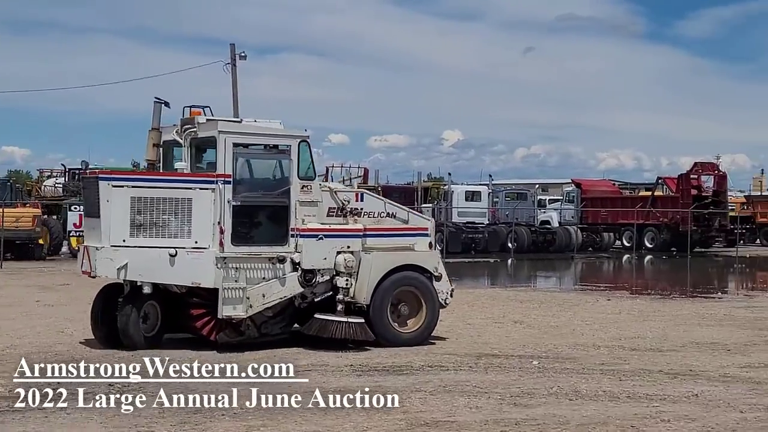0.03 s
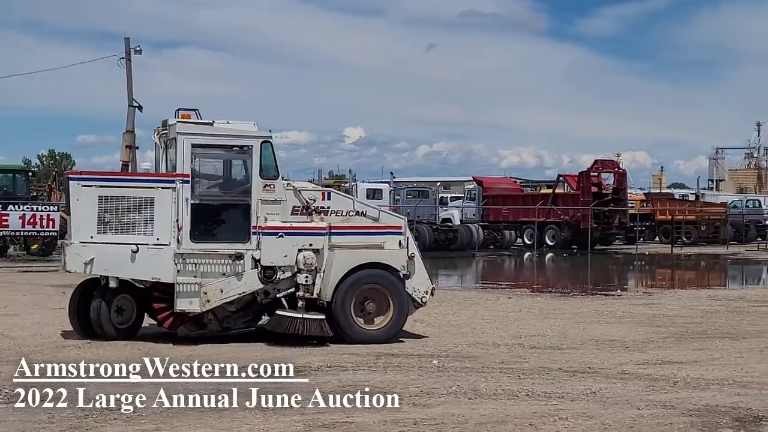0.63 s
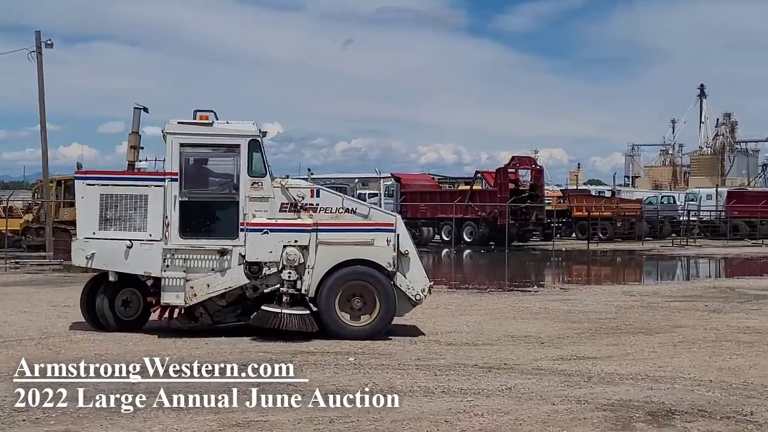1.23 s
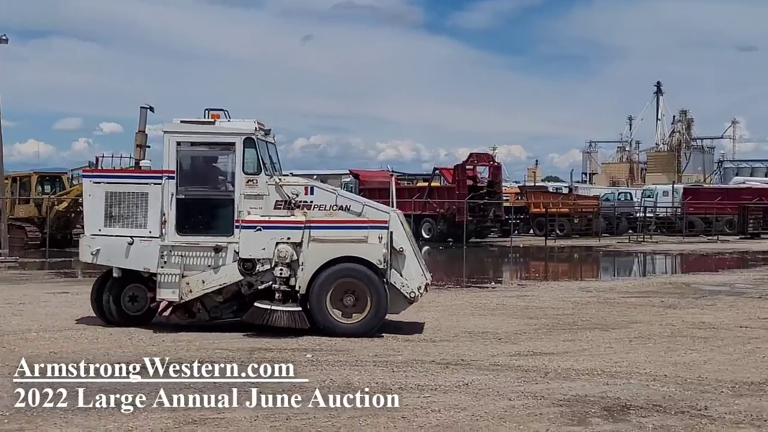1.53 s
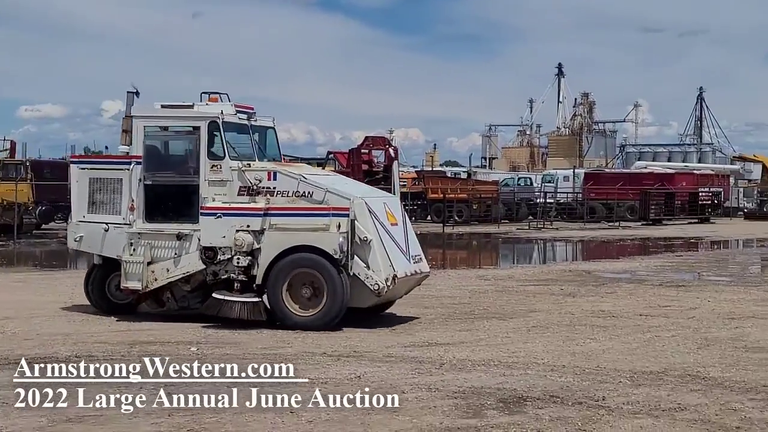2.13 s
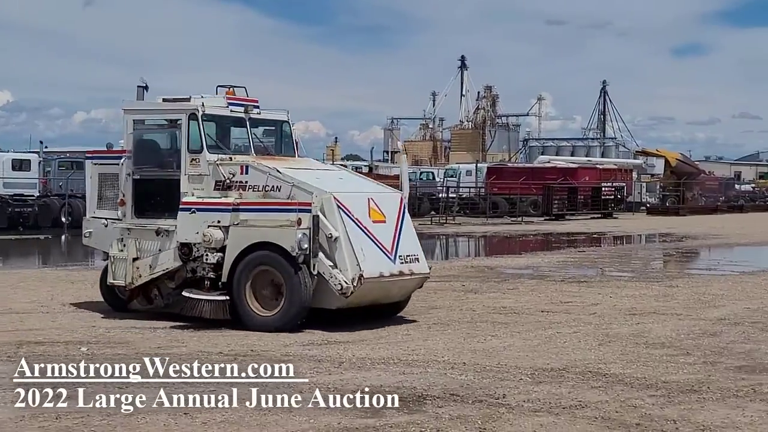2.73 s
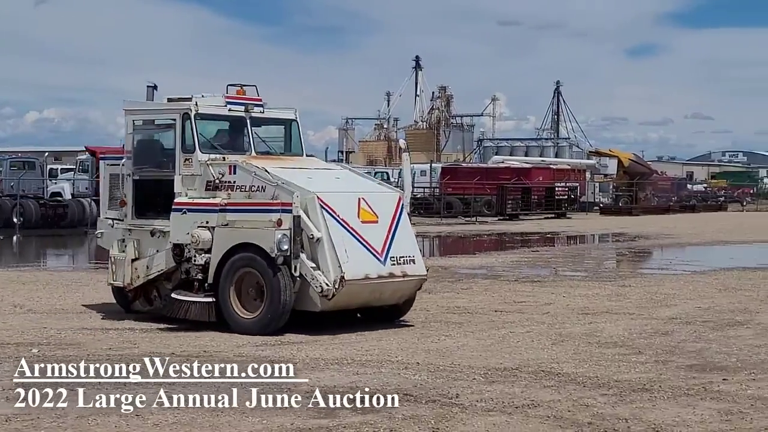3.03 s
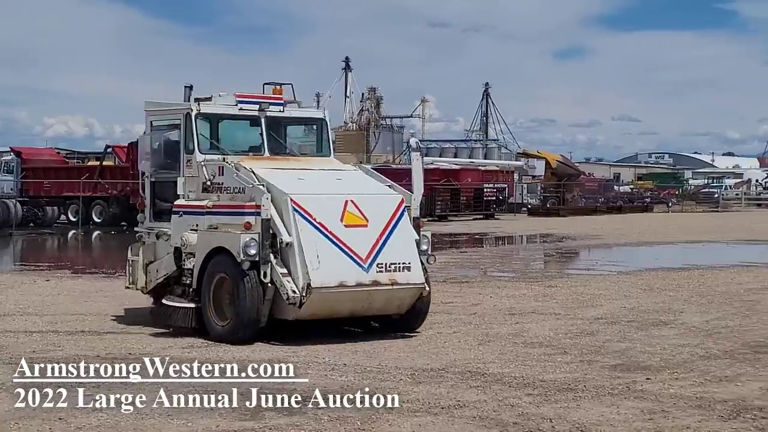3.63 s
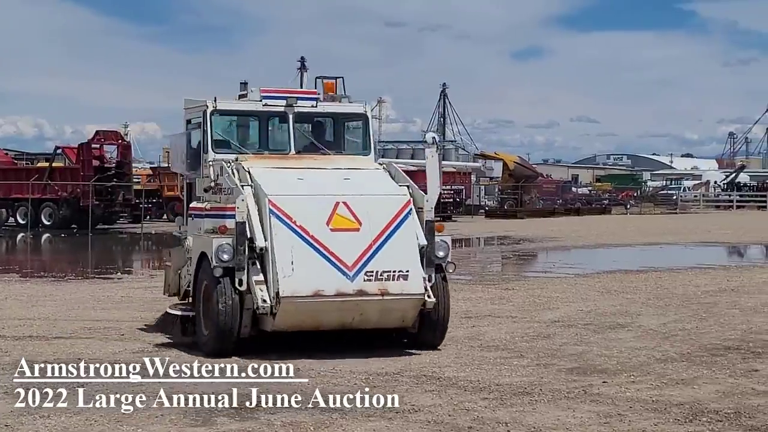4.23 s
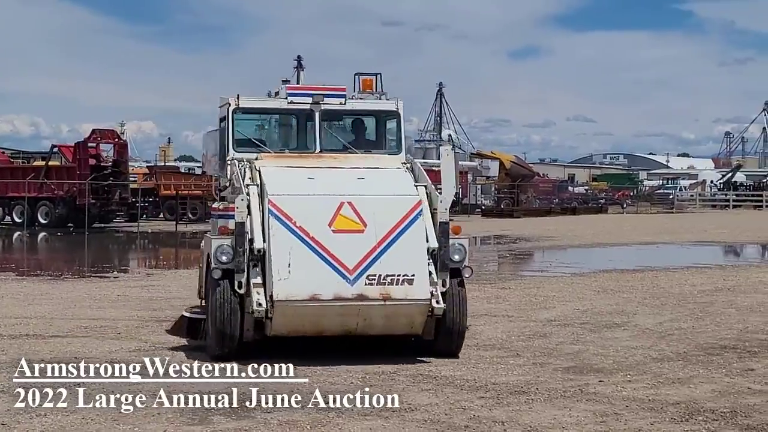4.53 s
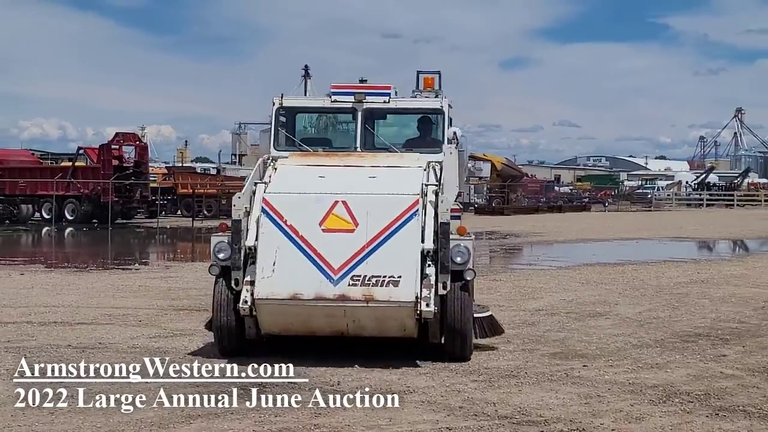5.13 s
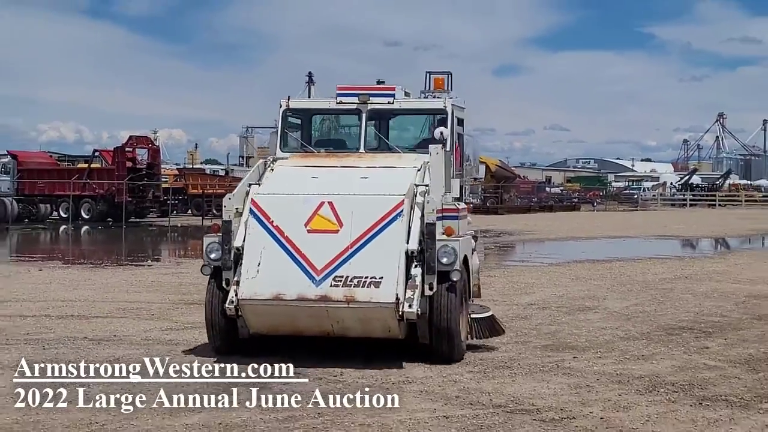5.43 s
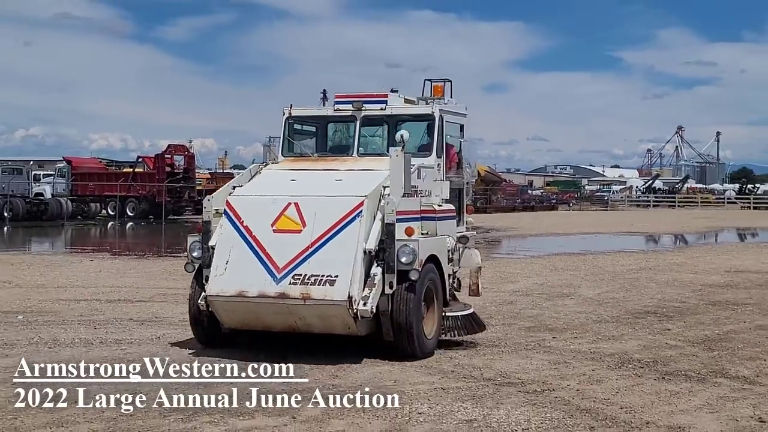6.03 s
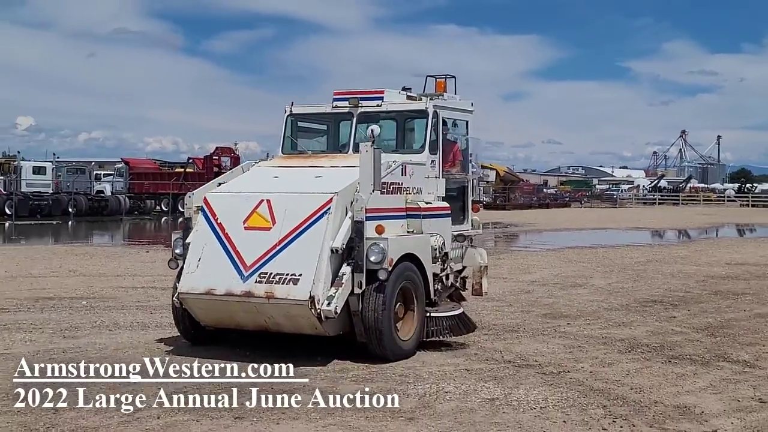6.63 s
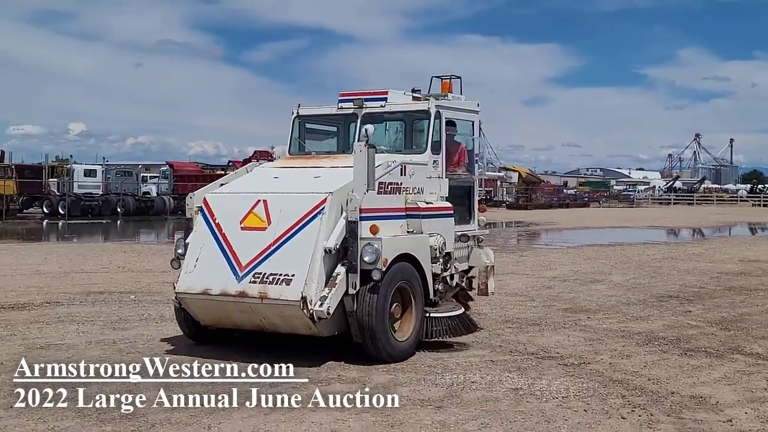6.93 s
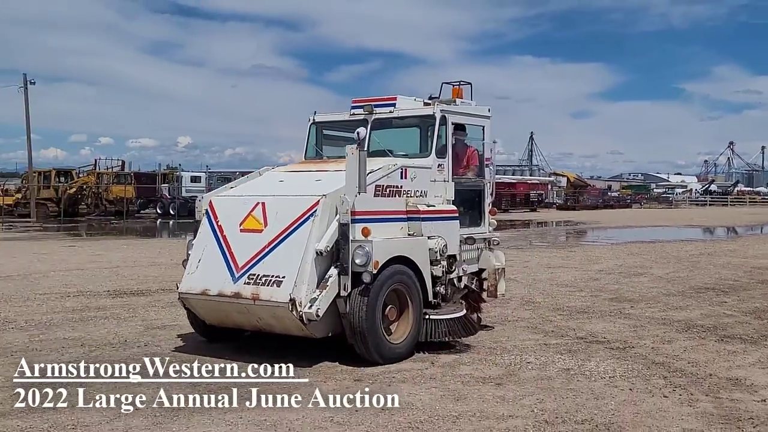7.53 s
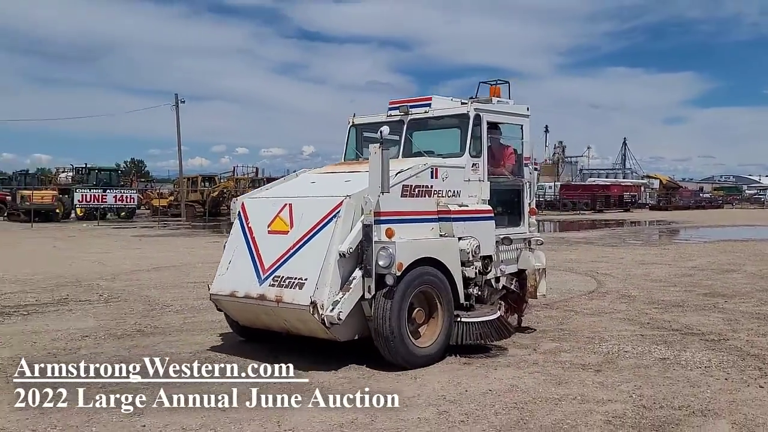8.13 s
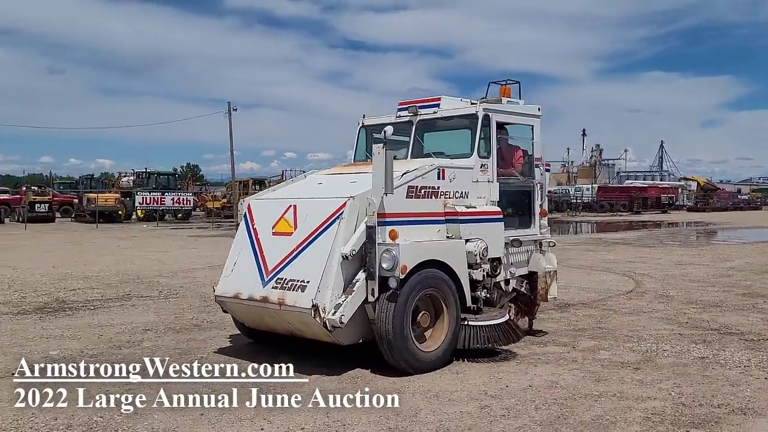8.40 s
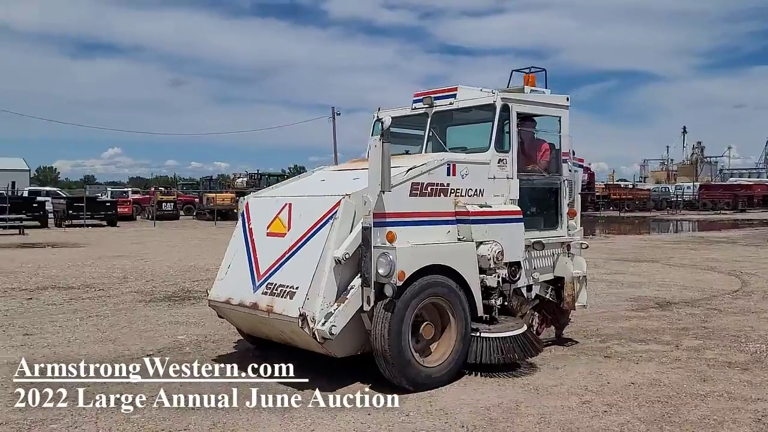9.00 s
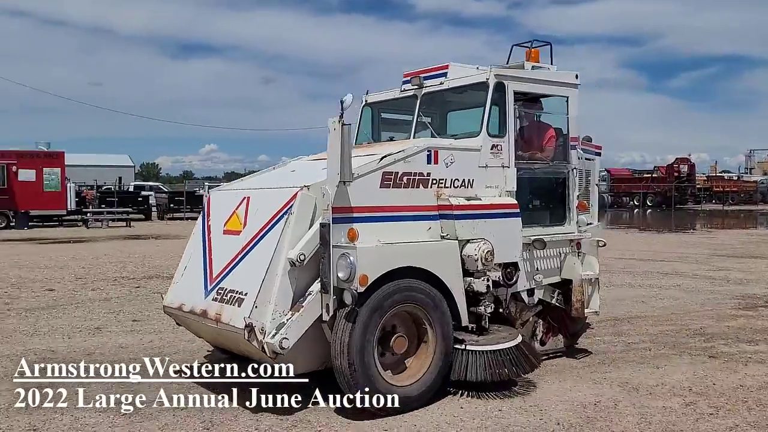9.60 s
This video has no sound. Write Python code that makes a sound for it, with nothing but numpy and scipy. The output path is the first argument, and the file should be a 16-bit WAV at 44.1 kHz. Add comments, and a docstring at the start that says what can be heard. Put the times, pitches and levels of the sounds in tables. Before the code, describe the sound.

A diesel street sweeper drives around on crunching gravel, its engine roaring and clattering steadily, with hydraulic droning and gusts of wind.

```python
"""A gravel yard, where a diesel street sweeper drives round, showing one side, its nose, then the other side.
The rear engine hums, roars and clatters, shaking panels and pipes, and a low drone comes from the nose.
Tyres crunch stones, loose parts tick and knock, and wind buffets the two microphone openings (ports).
As the nose comes round, oil hisses through the steering valve and the turbo whistles.
Then the hydraulic drive motor sings, rising and falling with the road speed."""
import sys
import numpy as np
from scipy import signal
from scipy.fft import rfft, irfft, next_fast_len
from scipy.io import wavfile
from scipy.ndimage import uniform_filter1d

SR = 44100
rng = np.random.default_rng(int(sys.argv[2]) if len(sys.argv) > 2 else 0)


def transcribe(signal):
    """Save signal, clipped to [-1, 1], as a 16-bit WAV file at the path in sys.argv[1]."""
    frames = np.atleast_2d(signal).T
    limited = np.clip(frames, -1, 1)
    pcm = np.round(limited * 32767).astype(np.int16)
    wavfile.write(sys.argv[1], SR, pcm)


N = 430399

# Engine speed, held nearly steady. Each row: time in seconds, firings per second.
FIRING_RATE = [(0, 55.6), (.3, 54.6), (.5, 56.2), (1.0, 56.8), (1.6, 56), (1.87, 54.2), (2.1, 57.3),
               (2.3, 58), (2.53, 55.1), (2.8, 57.4), (8.3, 57.3), (9, 56.4), (9.76, 57.8)]
# The exhaust's tones. Each row: multiple of the firing rate, level in dB.
EXHAUST_TONES = [(1, -31.5), (2, -37.5), (2.5, -39.5), (3, -39.5), (3.5, -49), (4, -41.5), (4.5, -44),
                 (6, -53.5)]
# Fan sound beams out of the side grilles. Each row: peak time in seconds, spread in seconds, level in dB.
FAN_BEAMS = [(.3, 0.49, -34), (1.62, 0.32, -33), (2.45, 0.29, -33.5), (7.2, 0.71, -35), (9.0, 0.6, -28.5)]
# Which way the sweeper faces. Each row: time in seconds, share of sound from the nose (0 to 1),
# delay of that sound at the left port in milliseconds.
HEADING = [(0, 0, 0.049), (2.9, 0.13, 0.046), (3.45, 0.45, 0.12), (4.1, 0.74, 0.37), (4.7, 0.77, 0.53),
           (6.3, 0.94, 0.51), (6.8, 0.93, .53), (7.4, 0.34, 0.53), (9.76, 0.31, 0.67)]
# How late the side's sound reaches the left port. Each row: time in seconds, delay in milliseconds.
SIDE_DELAY = [(0, -0.1), (3.2, -0.093), (7.3, 0.037), (9, .1), (9.76, 0.06)]
# How loudly the sweeper comes across as it turns. Each row: time in seconds, gain in dB.
TURN_GAIN = [(0, 5), (1.6, -0.5), (2.55, 1.5), (3.2, -2.5), (3.85, 3), (5.9, 2), (6.25, -0.5), (6.65, 3),
             (7.05, 0.5), (7.4, -1), (8.2, -3.5), (8.8, -2.5), (9.76, 1.5)]
# The engine's roar, and its clatter from the side and nose. Each row: frequency in Hz, strength in dB.
ROAR_SPECTRUM = [(100, -4), (190, 4.5), (260, 8), (340, 2.5), (430, -0.5), (560, 1.5), (720, 1),
                 (900, -6.5), (1200, -14), (2000, -83)]
CLATTER_SIDE = [(500, -17.5), (850, -6), (1000, -3), (1230, 2), (1450, -8.5), (1650, -3), (1850, -4.5),
                (2100, -7.5), (2400, -18), (2900, -23), (4500, -52)]
CLATTER_NOSE = [(500, -12), (850, -4), (1000, 4.5), (1230, 3.5), (1450, 4.5), (1650, 2.5), (1850, 0),
                (2100, -4.5), (2400, -9.5), (2900, -29), (4500, -48)]
# Ringing panels and pipes, each heard while it faces this way.
# Each row: peak time in seconds, spread in seconds, pitch in Hz, width in Hz, level in dB.
PANEL_RINGS = [(0.23, 0.69, 1228, 64, -45.5), (1.6, 0.37, 1335, 45, -44.5), (1.06, 1.75, 2205, 430, -47),
               (2.55, 0.73, 576, 450, -39), (3.77, 0.33, 1660, 420, -38.5), (4.3, 0.45, 2380, 1700, -47),
               (4.6, 0.091, 1540, 220, -47), (5.22, 0.5, 1600, 82, -44), (5.9, 0.6, 1670, 290, -42.5),
               (6.27, 0.22, 1810, 290, -39.5), (6.6, 0.13, 1770, 350, -37.5), (5.88, 0.3, 4050, 1100, -45),
               (6.87, 0.79, 4520, 750, -48), (6.5, 1.9, 344.5, 50, -39.5), (7.1, 3.6, 1578, 62, -47.5),
               (7.7, 1.6, 1110, 93, -49), (8.9, 0.3, 7300, 140, -64), (9.7, 0.19, 342, 290, -32.5)]
# The low, sinking drone. Each row: time in seconds, pitch in Hz, level in dB.
DRONE_CURVE = [(0, 70, -35), (2.85, 69.5, -35), (3.1, 69.1, -24.5), (4.3, 65.6, -24.5), (6.1, 62.4, -24.2),
               (6.75, 62.4, -28), (7, 62.4, -32), (7.7, 62.4, -30), (9.76, 62.4, -44)]
# Its swells and dips. Each row: middle in seconds, spread in seconds, change in dB.
DRONE_SWELLS = [(3.25, 0.21, 2), (4.75, 0.23, 2.5), (5.23, 0.1, -4), (5.62, 0.22, 2.8), (6.77, 0.033, 9)]
# How the oil pipes and the pump housing ring. Each row: pitch in Hz, width in Hz, strength in dB.
PIPE_RINGS = [(7290, 300, -7), (11030, 280, 0), (11960, 150, -4.5)]
HOUSING_RINGS = [(3380, 200, -14.5), (3900, 230, -6), (4320, 480, -4.5), (4930, 190, -7.5)]
# When each of them beams this way. Each row: peak time in seconds, spread in seconds, level in dB.
PIPE_BEAMS = [(0, 0.77, -62), (2.57, 0.13, -63), (2.6, .5, -64.5)]
HOUSING_BEAMS = [(2.53, 0.51, -50.5), (3.85, 0.097, -49), (5, 0.6, -50), (7.05, 0.15, -44),
                 (8.2, 0.37, -56), (9, 0.5, -67)]
# The gravel's crunch from the side and nose. Each row: frequency in Hz, strength in dB.
GRAVEL_SIDE = [(1800, -13), (2900, -1.5), (3400, -2), (3700, 0), (4450, 0.5), (5200, 2.5), (6000, 0),
               (6600, -2), (7300, -1.5), (8500, -12), (9600, -8), (11200, -8.5), (12500, -8.5), (15000, -9)]
GRAVEL_NOSE = [(1800, -16), (2900, 5.5), (3400, 2.5), (3700, 2.5), (4450, 2.5), (5200, -1.5), (6000, -1),
               (6600, 0), (7300, -1), (8500, -10), (9600, -14), (11200, -10.5), (12500, -7), (15000, -15)]
# How loose parts ring. Each row: pitch in Hz, strength in dB, seconds to fade by 60 dB.
LOOSE_PART_RINGS = [(433, -1.5, 0.029), (794, -4, 0.022), (1190, 1, 0.0089), (2000, -7.5, 0.015),
                    (2370, -26, 0.0077), (3820, -14, 0.0068), (4850, -15.5, 0.0065)]
# The breeze. Each row: time in seconds, level in dB, left minus right in dB.
BREEZE = [(0, -28, 8), (.4, -28.5, 7), (.75, -24.5, 3), (1.15, -29.5, -8), (1.75, -26, 0), (2.2, -25.5, -6),
          (2.7, -26.5, -4), (3.4, -24, -7.5), (4.4, -27.5, -7), (6.8, -26, -2), (7.3, -21.5, -2),
          (7.9, -22.5, 2), (8.65, -27, 5), (9.1, -28.5, -2), (9.76, -32.5, -8)]
# Gusts on the left port. Each row: start in seconds, end in seconds, level in dB.
GUSTS = [(0.16, 0.261, -16), (0.455, 0.641, -17.5), (.842, .892, -13), (7.68, 7.79, -14.5),
         (7.825, 8.05, -12.8), (8.05, 8.19, -16), (8.235, 8.305, -13.5), (8.472, 8.549, -19.5)]
# The rumble of the breeze and of the gusts. Each row: frequency in Hz, strength in dB.
BREEZE_SPECTRUM = [(15, -38), (30, -17), (45, -8), (62, -5.5), (85, -3.5), (125, -4.5), (180, -13),
                   (280, -16), (450, -35), (1000, -31.5)]
GUST_SPECTRUM = [(20, -29), (60, 0), (130, -2.5), (260, 0), (350, -5), (500, -16.5), (800, -29.5),
                 (2000, -67)]
# Single swirls of air slap the left port. Each row: start in seconds, level in dB.
WIND_SLAPS = [(0.166, 2), (0.85, -6), (8.248, -1)]
# Stones hit steel. Each row: start in seconds, level in dB, pitch in Hz.
STONE_PINGS = [(1.785, -51, 5510), (3.806, -48, 7800)]
# Loose parts knock. Each row: start in seconds, level in dB, brightness in dB per octave.
KNOCKS = [(1.792, -29, 0), (2.446, -29, 0), (5.297, -24, -4), (6.549, -21, -1), (6.884, -21.5, 0),
          (7.67, -18, 2), (7.774, -18.5, -5.5), (9.479, -25, 0)]
# Oil surges through the steering valve. Each row: peak time in seconds, spread in seconds, level in dB.
VALVE_SURGES = [(3.025, 0.025, -52), (4.85, 0.52, -48.5), (5.05, 0.1, -52), (5.72, 0.14, -43.5),
                (5.9, 0.027, -45), (6.0, 0.12, -57), (6.75, 0.17, -53)]
# The valve's hiss. Each row: frequency in Hz, strength in dB.
VALVE_SPECTRUM = [(3000, -4.5), (4000, -3), (4900, -9), (5600, -1), (6600, -3), (7500, -6), (8700, -19),
                  (10900, -16), (12500, -8), (15000, -19)]
# The valve's high note, rising and sinking with the flow.
# Each row: time in seconds, pitch in Hz, level in dB, left minus right in dB.
VALVE_SONG = [(3.9, 10600, -90, -13), (4.3, 11000, -62, -13), (4.65, 11500, -55.5, -13),
              (4.9, 11780, -49.5, -12), (5.2, 11900, -51, -12), (5.42, 11850, -55, -8),
              (5.62, 11750, -50.5, -5), (5.95, 11600, -51.5, -5), (6.4, 11400, -85, -5)]
# The turbo spins up and down. Each row: time in seconds, pitch in Hz.
TURBO_PITCH = [(3.7, 6800), (4.0, 7200), (4.55, 7980), (4.8, 8130), (5.2, 8330), (6.4, 7850)]
# The drive motor follows the road speed. Each row: time in seconds, pitch in Hz.
DRIVE_PITCH = [(5.4, 110), (6.05, 146), (6.4, 167), (6.68, 177), (6.86, 161), (6.98, 135), (7.14, 119),
               (7.4, 129), (7.85, 143), (8.72, 153), (9.0, 163), (9.76, 181)]
# It swells and dips with the load. Each row: time in seconds, level in dB.
DRIVE_LEVEL = [(5, -70), (5.55, -33), (6.15, -27.5), (6.8, -28.5), (6.97, -24.5), (7.2, -32), (7.6, -29),
               (7.9, -19.7), (8.28, -18), (8.5, -24), (8.73, -36), (8.95, -23), (9.27, -22.5),
               (9.45, -26.5), (9.76, -25.5)]
# Its upper tone, and a second wheel motor running an eighth faster in the turn with its own upper tone, as it
# pulls away. Each row: multiple of its pitch, level in dB.
PULL_TONES = [(1.125, -34), (2, -34), (2.25, -43)]
# The two ports hear pitches differently. Each row: frequency in Hz, left minus right in dB.
PORT_BALANCE = [(700, 0), (1300, -2), (2300, 3.5), (3100, 2), (4000, -1), (5400, 1), (6600, -6),
                (8200, -0.5)]


def from_db(db):
    """Turn decibels into a gain."""
    return 10 ** (np.asarray(db) / 20)


def rms_one(x):
    """Scale x so its average (rms) level is 1."""
    return x / np.sqrt(np.mean(x ** 2) + 1e-20)


def in_time(rows):
    """Join a table's timed rows with straight lines, giving one curve per value column."""
    s, *columns = np.transpose(rows)
    return [np.interp(np.arange(N) / SR, s, c) for c in columns]


def drift(hz):
    """A smooth random wander of size about 1; higher hz wanders faster."""
    r = np.exp(-80 * np.pi * hz / SR)
    slow = signal.lfilter([1], [1, -2 * r, r * r], rng.standard_normal(N // 40 + 2002))[2000:]
    return np.interp(np.arange(N) / 40, np.arange(len(slow)), rms_one(slow))


def angle(hz):
    """The running phase of something that turns at hz."""
    return 2 * np.pi * np.cumsum(hz) / SR


def tone(phase, db):
    """A pure tone with an rms level of db."""
    return np.sqrt(2) * from_db(db) * np.sin(phase)


def pan(left_db):
    """Gains for the two ports, with the left one left_db above the right."""
    return from_db(np.array([[.5], [-.5]]) * left_db)


def bump(s, spread):
    """A smooth hill: 1 at time s, half at spread seconds either side."""
    return 1 / (1 + ((np.arange(N) / SR - s) / spread) ** 4)


def bumps(rows):
    """Several hills of gain added up."""
    return sum(from_db(db) * bump(s, spread) for s, spread, db in rows)


def rise(start, length):
    """A ramp from 0 to 1, timed in seconds."""
    return np.clip((np.arange(N) / SR - start) / length, 0, 1)


def noise_pair(alike):
    """White noise at both ports: unrelated when alike is 0, the same when it is 1."""
    shared, apart = rng.standard_normal((2, N))
    return np.sqrt((1 + alike) / 2) * shared + np.sqrt((1 - alike) / 2) * apart * [[1], [-1]]


def colour(x, spectrum):
    """Shape x with a spectrum, fading beyond both ends; the result has level 1."""
    size = next_fast_len(N)
    hz, db = np.transpose(spectrum)
    bins = np.arange(size // 2 + 1) * SR / size
    gain = from_db(np.interp(np.log(bins + 1), np.log(hz), db))
    gain *= np.minimum(bins / hz[0], 1) ** 2 * np.minimum(hz[-1] / (bins + 1), 1) ** 2
    return rms_one(irfft(rfft(x, size) * gain, size)[..., :N])


def resonate(x, hz, width):
    """Make x ring in a band around hz; the result has level 1."""
    r = np.exp(-np.pi * width / SR)
    section = [1 - r, 0, r - 1, 1, -2 * r * np.cos(2 * np.pi * hz / SR), r * r]
    return rms_one(signal.sosfilt([section, section], x))


def ringing(shake, rings):
    """One shake sets off all the rings of a body."""
    return sum(from_db(db) * resonate(shake, hz, width) for hz, width, db in rings)


def gliding_noise(hz, width):
    """A band of noise whose centre follows hz; the result has level 1."""
    r = np.exp(-np.pi * width / SR)
    band = signal.lfilter([1], [1, -2 * r, r * r], noise_pair(.1) + 1j * noise_pair(.1))
    return rms_one(np.real(band * np.exp(1j * angle(hz))))


def strike(s, hz, db, fade_s):
    """A tone struck at time s that dies away by 60 dB in fade_s seconds."""
    age, out = np.arange(SR // 4) / SR, np.zeros(N)
    start = round(s * SR)
    out[start:start + len(age)] = from_db(db - 60 * age / fade_s) * np.sin(2 * np.pi * hz * age)
    return out


def throb(phase, depth_db, uneven_db):
    """A gain that pulses once per turn of phase, no two pulses equally strong."""
    return rms_one(from_db(depth_db * np.cos(phase) + uneven_db * drift(27.4)))


def delay_left(x, ms):
    """Sound from one side reaches the left port late (early if ms is negative)."""
    n = np.arange(N)
    return np.array([np.interp(n - np.round(ms * SR / 1000), n, x[0]), x[1]])


def by_heading(side, nose):
    """Blend what the side and the nose send out as the sweeper turns."""
    share, nose_ms = in_time(HEADING)
    side_ms, = in_time(SIDE_DELAY)
    return np.sqrt(1 - share) * delay_left(side, side_ms) + np.sqrt(share) * delay_left(nose, nose_ms)


def body_echoes(x, strength, slide_per_s=.02, count=4):
    """Ground and bodywork add quick echoes whose delays slide as the sweeper moves."""
    n = np.arange(N)
    lags = rng.uniform(.0005, .004, (2, count)) * SR
    stretch = 1 + slide_per_s * n / SR
    echoes = [sum(np.interp(n - np.round(lag * stretch), n, port) for lag in port_lags)
              for port, port_lags in zip(x, lags)]
    return (x + strength * np.array(echoes)) / np.sqrt(1 + count * strength ** 2)


def exhaust(firing, waver_db=2.5):
    """Exhaust pulses hum at multiples of the firing rate, each tone wavering a little."""
    out = 0
    for multiple, db in EXHAUST_TONES:
        phase = multiple * firing + 2 * np.pi * rng.random() + .36 * drift(7.2)
        out = out + tone(phase, db + waver_db * drift(1.6))
    return out


def fan(firing, blades=5, floor_db=-43, waver_db=3):
    """The fan blades hum, loudest when a side grille faces this way."""
    blade_tone = tone(blades * firing + .47 * drift(12), waver_db * drift(8))
    return np.hypot(from_db(floor_db), bumps(FAN_BEAMS)) * blade_tone


def engine_roar(bursts, base_db=-34, nose_db=5.5, head_on_db=3.5):
    """The body roars, more with the nose in view and most when it points straight this way."""
    side = colour(noise_pair(.79) * bursts, ROAR_SPECTRUM)
    nose = colour(noise_pair(.75), ROAR_SPECTRUM)
    facing_db = nose_db * in_time(HEADING)[0] + head_on_db * bump(5.05, spread=.61)
    gain = from_db(base_db + .054 * in_time(TURN_GAIN)[0] + facing_db)
    return gain * by_heading(side, nose) * pan(-.89)


def engine_clatter(firing, bursts, base_db=-36):
    """Bursts of burning fuel rattle the engine block, pulsing most clearly from the side."""
    block = colour(noise_pair(.47) * bursts, CLATTER_SIDE)
    side = body_echoes(block, strength=.17)
    nose = colour(noise_pair(.69) * throb(firing, depth_db=-.5, uneven_db=-1.1), CLATTER_NOSE)
    gain = from_db(base_db + .99 * in_time(TURN_GAIN)[0])
    return gain * by_heading(side, nose) * pan(1.25)


def panels(bursts, flicker_db=2):
    """The engine shakes the panels; each ring swells and fades as the sweeper turns and jolts."""
    shakes = [noise_pair(.62) * bursts, noise_pair(1) * bursts]
    rings = 0
    for k, (s, spread, hz, width, db) in enumerate(PANEL_RINGS):
        gain = bump(s, spread) * from_db(db + flicker_db * drift(8.4))
        rings = rings + gain * resonate(shakes[k % 2], hz, width)
    share, nose_ms = in_time(HEADING)
    return delay_left(rings, share * nose_ms) * pan(.87)


def drone(wobble=.00393, waver_db=.5):
    """The hydraulics drone from the nose, louder and lower as it comes round."""
    hz, db = in_time(DRONE_CURVE)
    phase = angle(hz * (1 + wobble * drift(6.8)))
    swell_db = sum(change * bump(s, spread) for s, spread, change in DRONE_SWELLS)
    return tone(phase, db + swell_db + waver_db * drift(2.3)) * pan(-2.4)


def oil_pipes(firing, floor_db=-69.5):
    """The hydraulic pipes sizzle once per engine cycle, which is every four firings."""
    shake = noise_pair(.32) * throb(firing / 4, depth_db=5, uneven_db=2.8)
    return (from_db(floor_db) + bumps(PIPE_BEAMS)) * ringing(shake, PIPE_RINGS)


def pump_housing(firing, floor_db=-60):
    """Every firing shakes the pump housing into a bright clatter."""
    shake = noise_pair(.1) * throb(firing, depth_db=1.5, uneven_db=3)
    return (from_db(floor_db) + bumps(HOUSING_BEAMS)) * ringing(shake, HOUSING_RINGS) * pan(-1.8)


def stone_cracks(per_s, spread_db):
    """Stones crack in clumps, most small and a few large."""
    cracks = rng.random(N) < per_s * from_db(4 * drift(8)) / SR
    sizes = from_db(spread_db * np.minimum(rng.exponential(1, N), 4.5))
    return rms_one(cracks * sizes * noise_pair(.95))


def gravel(firing, base_db=-44.5, crack_db=-7):
    """The tyres crunch stones over a hiss that pulses with the engine."""
    pulsing = throb(firing, depth_db=-1.7, uneven_db=1.3)
    side = noise_pair(.74) * pulsing + from_db(crack_db) * stone_cracks(per_s=650, spread_db=2)
    side = body_echoes(colour(side, GRAVEL_SIDE), strength=.18)
    nose = noise_pair(.33) * pulsing + from_db(crack_db) * stone_cracks(per_s=900, spread_db=1)
    nose = colour(nose, GRAVEL_NOSE)
    gain = from_db(base_db + .98 * in_time(TURN_GAIN)[0])
    return gain * by_heading(side * pan(2.6), nose * pan(-.44))


def rattle(per_s=22, level_db=-52):
    """Chains and links tick at random as the sweeper jolts along."""
    taps = (rng.random(N) < per_s / SR).astype(float)
    age = np.arange(SR // 20) / SR
    ring = sum(from_db(db - 60 * age / fade_s) * np.sin(2 * np.pi * hz * age)
               for hz, db, fade_s in LOOSE_PART_RINGS)
    return from_db(level_db) * rms_one(signal.oaconvolve(taps, ring)[:N])


def wind(lump_db=1.5, gust_lump_db=4.5, edge_s=.029):
    """Swirling air rumbles on each port; stronger gusts roll steadily over the left one."""
    breeze_db, left_db = in_time(BREEZE)
    lumps = from_db(lump_db * np.array([drift(9.4), drift(6.3)]))
    breeze = from_db(breeze_db) * colour(lumps * noise_pair(.34), BREEZE_SPECTRUM) * pan(left_db)
    buffet = colour(from_db(gust_lump_db * drift(85)) * noise_pair(0), GUST_SPECTRUM)
    buffet /= np.sqrt(uniform_filter1d(buffet ** 2, SR // 20, axis=-1) + 1e-9)  # even out its level
    gust_gain = sum(from_db(db) * (rise(start - edge_s / 2, edge_s) - rise(end - edge_s / 2, edge_s))
                    for start, end, db in GUSTS)
    gusts = gust_gain * buffet * from_db([[0], [-18]])
    low_cut = signal.butter(6, 35, "high", fs=SR, output="sos")
    return signal.sosfilt(low_cut, breeze + gusts)


def wind_slaps(hz=180, fade_s=.018):
    """The hardest swirls of air thump the left port."""
    return sum(strike(s, hz, db, fade_s) for s, db in WIND_SLAPS) * from_db([[0], [-18]])


def stone_pings(fade_s=.04):
    """Flung stones ping off steel."""
    return sum(strike(s, hz, db, fade_s) for s, db, hz in STONE_PINGS)


def knocks(pivot_hz=1000):
    """Loose parts knock: hard hits favour the rings above pivot_hz, soft hits those below."""
    out = np.zeros(N)
    for s, hit_db, brightness in KNOCKS:
        for hz, ring_db, fade_s in LOOSE_PART_RINGS:
            db = hit_db + ring_db + brightness * np.log2(hz / pivot_hz)
            out += strike(s, hz, db, fade_s) * rng.choice([-1, 1])
    return out


def steering_valve(halo_hz=1500, core_hz=300, core_db=-6, flutter_db=3.5, sputter_db=1.6):
    """Oil sputters through the valve on the right: a hiss, and a high note with a narrow core."""
    hiss = bumps(VALVE_SURGES) * colour(noise_pair(.23), VALVE_SPECTRUM)
    hz, db, left_db = in_time(VALVE_SONG)
    halo = gliding_noise(hz, width=halo_hz)
    core = from_db(core_db + flutter_db * drift(17)) * gliding_noise(hz, width=core_hz)
    song = from_db(db) * rms_one(halo + core)
    sputter = from_db(sputter_db * drift(34))
    return sputter * (hiss * pan(-10) + song * pan(left_db))


def turbo(level_db=-57, flutter_db=3.5):
    """The spinning turbo gives a gliding whistle while the nose points this way."""
    spin = angle(in_time(TURBO_PITCH)[0] * (1 + .01 * drift(400)))
    return bump(4.5, spread=.55) * tone(spin, level_db + flutter_db * drift(25)) * pan(2)


def drive_motor(wobble=.00393, flutter_db=3):
    """The hydraulic motor's pitch follows road speed; as it pulls away, its upper tone and a second, slightly
    faster wheel motor join."""
    shaft = angle(in_time(DRIVE_PITCH)[0] * (1 + wobble * drift(5.9)))
    main = tone(shaft, in_time(DRIVE_LEVEL)[0])
    upper = sum(tone(multiple * shaft + .4 * drift(15), db + flutter_db * drift(8.2))
                for multiple, db in PULL_TONES)
    return (main + rise(start=8.5, length=.9) * upper) * pan(.4)


def scene():
    """Add up all the sounds; one firing rhythm ties together everything the engine shakes."""
    firing = angle(in_time(FIRING_RATE)[0] * (1 + .0038 * drift(5.1)))
    hum = exhaust(firing) + fan(firing)
    bursts = throb(firing, depth_db=1.5, uneven_db=1)
    engine = hum + engine_roar(bursts) + engine_clatter(firing, bursts) + panels(bursts)
    hydraulics = drone() + oil_pipes(firing) + pump_housing(firing)
    rolling = gravel(firing) + rattle()
    air = wind() + wind_slaps()
    hits = stone_pings() + knocks()
    return engine + hydraulics + rolling + air + hits + steering_valve() + turbo() + drive_motor()


def record(dry, ceiling=.85, cutoff_hz=15750):
    """Each port favours some pitches, the biggest peaks are rounded off and the top treble is cut."""
    size = next_fast_len(N)
    hz, left_db = np.transpose(PORT_BALANCE)
    bins = np.arange(size // 2 + 1) * SR / size
    balance = pan(np.interp(np.log(bins + 1), np.log(hz), left_db))
    heard = irfft(rfft(dry, size) * balance, size)[:, :N]
    rounded = heard / (1 + (heard / ceiling) ** 6) ** (1 / 6)
    high_cut = signal.ellip(12, .1, 90, cutoff_hz, fs=SR, output="sos")
    return signal.sosfilt(high_cut, rounded)


dry = scene()
out = record(dry)
transcribe(out)
```